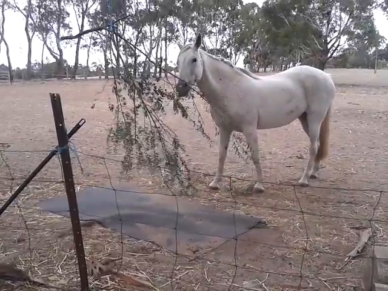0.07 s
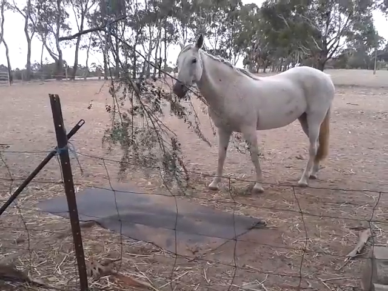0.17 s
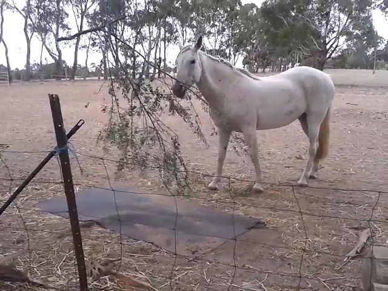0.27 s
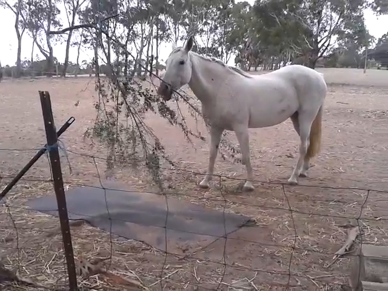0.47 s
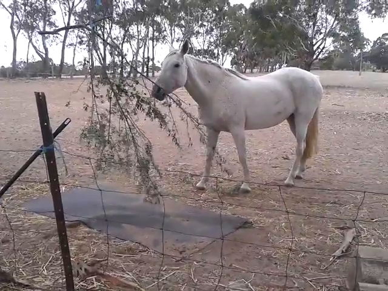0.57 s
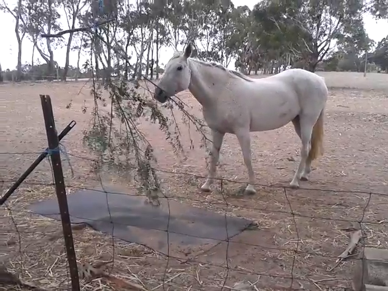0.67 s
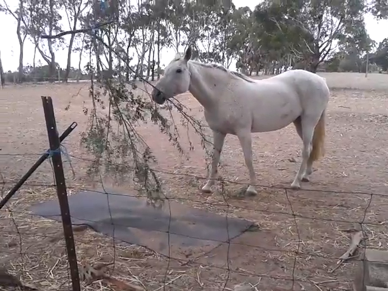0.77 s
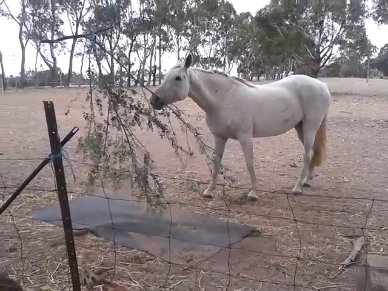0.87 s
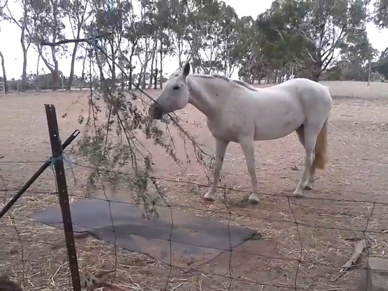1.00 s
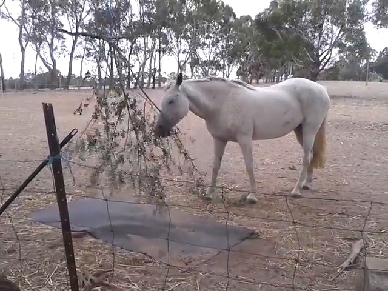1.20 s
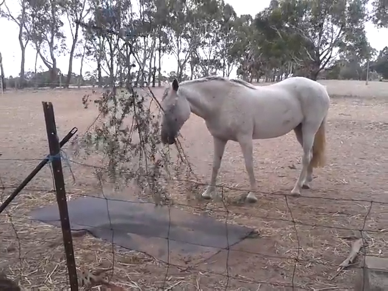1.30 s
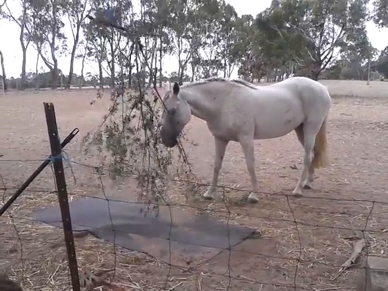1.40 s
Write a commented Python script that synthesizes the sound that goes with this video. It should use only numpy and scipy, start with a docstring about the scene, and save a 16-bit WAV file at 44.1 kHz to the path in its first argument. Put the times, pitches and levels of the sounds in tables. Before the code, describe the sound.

Wind bumps the microphone in short low pulses from about 0.2 seconds, over a faint steady hiss of air and trees. The hardest thump lands near 0.45 seconds, with a light rustle of dry leaves, and the wind fades by 0.8. Between about 1.1 and 1.25 seconds five small twigs snap as a horse pulls a branch. Leaves rustle again, and a few soft wind bumps follow around 1.3.

```python
"""A dry paddock in a light wind, where a horse pulls at a hanging leafy branch.
Air and trees hiss steadily from the start. Soon small swirls of wind bump the microphone
in short low pulses over a flutter; the hardest lands near 0.45 s as a falling thump.
Dry leaves rustle in tiny ticks around it, then wind and leaves die down.
From about 1.1 s five twigs snap, the leaves rustle again and a few soft bumps follow."""
import sys
import numpy as np
from scipy import signal
from scipy.fft import rfft, irfft
from scipy.io import wavfile
from scipy.ndimage import uniform_filter1d

SR = 44100
rng = np.random.default_rng(int(sys.argv[2]) if len(sys.argv) > 2 else 0)


def wav_out(sig):
    """Save sig, one row per channel (or a flat mono array), as 16-bit PCM at SR to the path in sys.argv[1]."""
    wavfile.write(sys.argv[1], SR, np.round(np.clip(np.atleast_2d(sig).T, -1, 1) * 32767).astype(np.int16))


N = 63945

# Swirls of wind that bump the microphone. Each row: middle in seconds, level in dB, pitch in Hz.
WIND_BUMPS = [(0.162, -44, 220), (0.2103, -24.5, 223), (0.2216, -33, 293), (0.2274, -26, 303),
              (0.2576, -30, 352), (0.2637, -22, 400), (0.274, -27.5, 307), (.2985, -39, 330),
              (.315, -32.5, 330), (.368, -40, 241), (0.394, -28.5, 277), (.402, -32, 247),
              (0.4178, -27.5, 244), (.434, -29.5, 327), (0.453, -28, 164), (0.4624, -23, 268),
              (0.5034, -18, 402), (.5058, -20, 460), (0.5107, -25.5, 860), (0.5109, -15, 375),
              (0.5172, -33.5, 180), (.527, -29, 293), (0.5387, -29, 199), (0.5539, -24.5, 232),
              (.5635, -40, 226), (.707, -40.5, 214), (.719, -36, 230), (.763, -38, 278), (.783, -44, 199),
              (0.956, -49, 230), (0.991, -42.5, 186), (1.047, -49.5, 160), (1.2758, -37, 303),
              (1.322, -42, 240), (1.352, -37.5, 240)]
# How the wind's flutter swells and fades. Each row: time in seconds, level in dB.
FLUTTER_LEVELS = [(0, -76), (.11, -71), (.165, -56), (.22, -48), (.335, -51), (.41, -42.5), (.46, -39.5),
                  (.55, -45.5), (.59, -59.5), (.67, -58), (.72, -51), (.83, -66.5), (.92, -74.5),
                  (.98, -63), (1.1, -71), (1.23, -70), (1.33, -53.5), (1.45, -65)]
# The low tone of that flutter. Each row: frequency in Hz, relative level in dB.
FLUTTER_TONE = [(25, -15.5), (60, -33), (85, -14.5), (120, -3), (200, 0.5), (320, -7), (500, -9.5),
                (800, -24), (1600, -77)]
# Twigs breaking. Each row: start in seconds, level in dB, a number that multiplies the ring's pitch.
TWIG_SNAPS = [(1.0685, -40.5, 0.93), (1.1001, -24, 1.0), (1.173, -42, 0.82), (1.193, -34.5, 1),
              (1.2407, -28.5, 0.89)]
# The tone of tearing wood fibres. Each row: frequency in Hz, relative level in dB.
FIBRE_TONE = [(200, -25), (800, 1.5), (1600, -2.5), (3400, -3), (4400, 1.5), (5300, 5), (6500, -0.5),
              (9000, -9.5), (12000, -12.5), (16000, -10.5)]
# The notes a twig rings with. Each row: pitch in Hz, dB relative to the snap, fade time in seconds.
TWIG_NOTES = [(880, -24, 0.0052), (3510, -20, 0.0031), (5450, -12, 0.005), (9630, -21, .002),
              (12400, -24, 0.0024)]
# How the rustle of leaves swells and fades. Each row: time in seconds, level in dB.
RUSTLE_LEVELS = [(0, -77), (.36, -58.5), (.47, -49.5), (.57, -50), (.7, -60.5), (1.06, -65), (1.18, -52.5),
                 (1.225, -54.5), (1.26, -49.5), (1.31, -50.5), (1.35, -56), (1.45, -58)]
# The bright tone of dry leaves. Each row: frequency in Hz, relative level in dB.
LEAF_TONE = [(300, -23), (1000, -2), (2500, -3.5), (3800, -3), (5200, 6.5), (6500, -2.5), (8500, -11.5),
             (15500, -17.5)]
# The tone of distant air and trees. Each row: frequency in Hz, relative level in dB.
HISS_TONE = [(25, -19), (70, -21), (150, -17.5), (330, 4.5), (600, -1), (950, -0.5), (1600, -5), (2700, -7),
             (3800, -4.5), (4600, -1), (5300, 2.5), (6300, -4.5), (7600, -11), (11000, -17), (15500, -17.5)]


def wind_on_microphone():
    """Single swirls of air, their bass thinned by the microphone, over a flutter that follows the gust."""
    bass_cut = signal.butter(2, 103, "high", fs=SR, output="sos")  # weakens sound below 103 Hz
    swirls = signal.sosfilt(bass_cut, wind_bumps() + wind_thump())
    roughness_db = 4 * wander(steps_per_s=60)
    rough_noise = rng.standard_normal(N) * undb(roughness_db)
    flutter = unit(shape_tone(rough_noise, FLUTTER_TONE))
    return swirls + flutter * level_curve(FLUTTER_LEVELS)


def wind_thump():
    """The hardest swirl hits the microphone, whose bass filter smears it into a short falling thump."""
    start_hz, end_hz, level_db = 1166, 214, -3.5
    rise_s, fade_s, fall_s = 0.00058, 0.003, 0.0018
    age = seconds_since(0.4446)
    cycles = end_hz * age + (start_hz - end_hz) * fall_s * (1 - np.exp(-age / fall_s))
    loudness = (1 - np.exp(-(age / rise_s) ** 2)) * np.exp(-age / fade_s)
    thump = -undb(level_db) * loudness * np.sin(2 * np.pi * cycles)
    treble_cut = signal.butter(2, 2050, fs=SR, output="sos")  # softens sound above 2050 Hz
    return signal.sosfiltfilt(treble_cut, thump)


def wind_bumps():
    """Each swirl is one smooth swing of air pressure, about a cycle long."""
    half_width_cycles = 0.41
    bumps = np.zeros(N)
    for middle_s, db, hz in WIND_BUMPS:
        cycles = (np.arange(N) / SR - middle_s) * hz
        swell = np.exp(-0.5 * (cycles / half_width_cycles) ** 2)
        bumps += undb(db) * swell * np.cos(2 * np.pi * cycles)
    return bumps


def twig_snaps():
    """A twig breaks with a crack, a short burst of tearing fibres, a brief ring and a faint tail."""
    tear_db, tear_fade_s = -7.5, 0.0021
    tail_db, tail_fade_s = -20, 0.031
    cracks, fibres, rings = np.zeros(N), np.zeros(N), np.zeros(N)
    for start_s, db, pitch_factor in TWIG_SNAPS:
        age = seconds_since(start_s)
        cracks[int(start_s * SR)] += undb(db - 1)  # a click one sample long
        tear = undb(tear_db) * np.exp(-age / tear_fade_s)
        tail = undb(tail_db) * np.exp(-age / tail_fade_s)
        fibres += undb(db) * (age > 0) * (tear + tail) * rng.standard_normal(N)
        for hz, note_db, fade_s in TWIG_NOTES:
            note = np.sin(2 * np.pi * hz * pitch_factor * age)
            rings += undb(db + note_db) * np.exp(-age / fade_s) * note
    return cracks + shape_tone(fibres, FIBRE_TONE) + rings


def leaf_rustle():
    """Dry leaves touch each other in many tiny ticks, a few of them louder."""
    ticks_per_s, average_boost_db = 3000, 1.5
    touches = rng.random(N) < ticks_per_s / SR
    ticks = touches * rng.standard_normal(N)
    ticks *= undb(average_boost_db * rng.exponential(size=N))
    return unit(shape_tone(ticks, LEAF_TONE)) * level_curve(RUSTLE_LEVELS)


def distant_hiss():
    """Air and trees far away make a smooth hiss that barely wavers."""
    hiss = unit(shape_tone(rng.standard_normal(N), HISS_TONE))
    level_db = -50 + 0.05 * wander(steps_per_s=9.6)
    return hiss * undb(level_db)


def undb(db):
    """Turn decibels into a number to multiply a sound by."""
    return 10 ** (np.asarray(db) / 20)


def unit(sound):
    """Scale a sound so that its average level (root mean square) is 1."""
    return sound / np.sqrt(np.mean(sound ** 2))


def level_curve(rows):
    """Join rows of seconds and dB into a volume for every sample."""
    times, db = np.array(rows).T
    return undb(np.interp(np.arange(N) / SR, times, db))


def shape_tone(sound, rows):
    """Make some frequencies stronger and others weaker, following rows of Hz and dB."""
    hz, db = np.array(rows).T
    log_frequencies = np.log(np.fft.rfftfreq(2 * N, 1 / SR) + 1)
    gain = unit(undb(np.interp(log_frequencies, np.log(hz), db)))
    # Fold the filter's early half onto its late half, so it rings after a click and never before.
    log_filter = irfft(np.log(gain))
    log_filter[1:N] *= 2
    log_filter[N + 1:] = 0
    response = np.exp(rfft(log_filter))
    return irfft(rfft(sound, 2 * N) * response)[:N]


def wander(steps_per_s):
    """Random steps, smoothed twice into a drifting curve with a typical size of 1."""
    step_samples = int(SR / steps_per_s)
    steps = rng.standard_normal(N)[np.arange(N) // step_samples]
    ramps = uniform_filter1d(steps, step_samples)
    return unit(uniform_filter1d(ramps, step_samples))


def seconds_since(start_s):
    """The time since a moment, and zero before it."""
    return np.maximum(np.arange(N) / SR - start_s, 0)


def scene():
    """Wind, branch and background add up in one channel."""
    return (wind_on_microphone() + twig_snaps() + leaf_rustle() + distant_hiss())[None]


def record(dry):
    """Cut away the very highest treble steeply."""
    top_hz = 16100
    return signal.sosfilt(signal.ellip(10, 0.2, 70, top_hz, fs=SR, output="sos"), dry)


dry = scene()
out = record(dry)
wav_out(out)
```